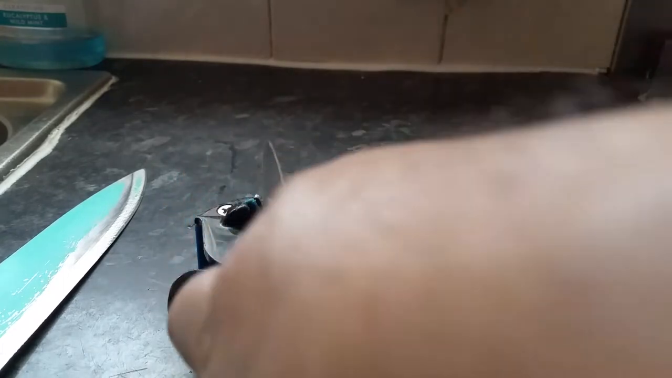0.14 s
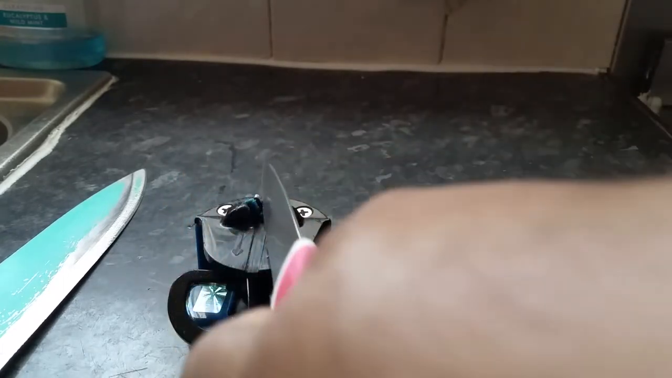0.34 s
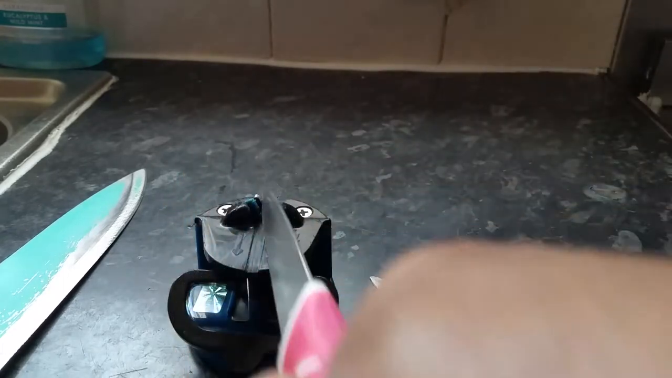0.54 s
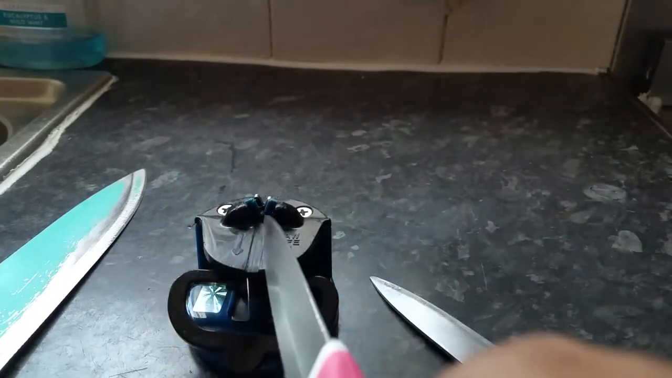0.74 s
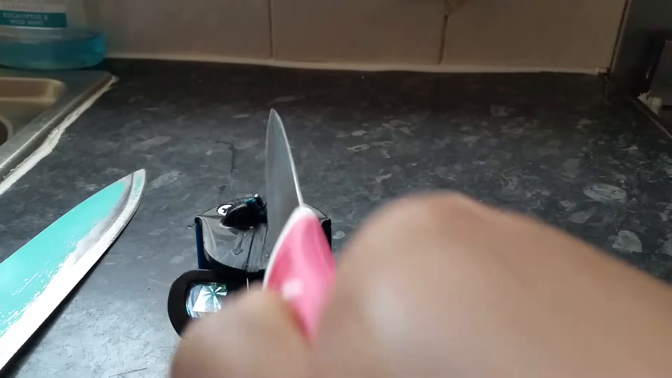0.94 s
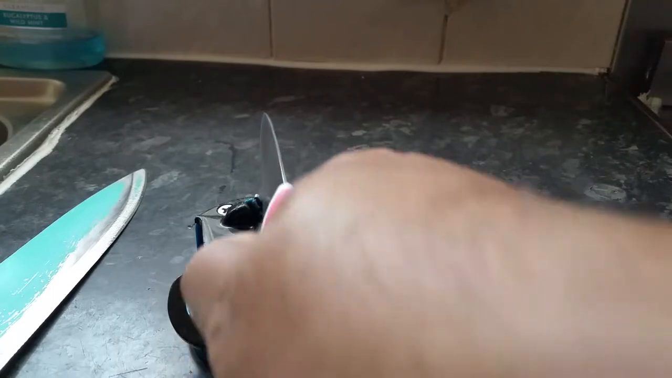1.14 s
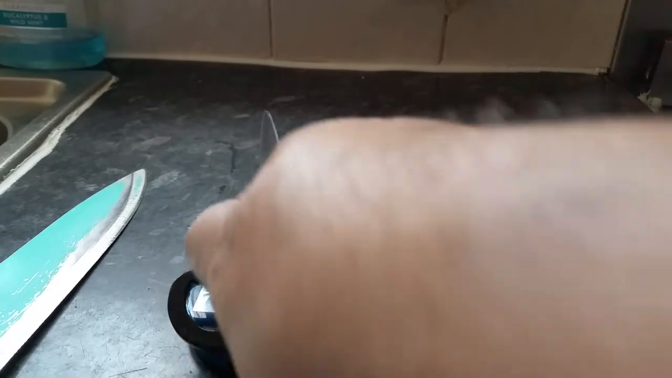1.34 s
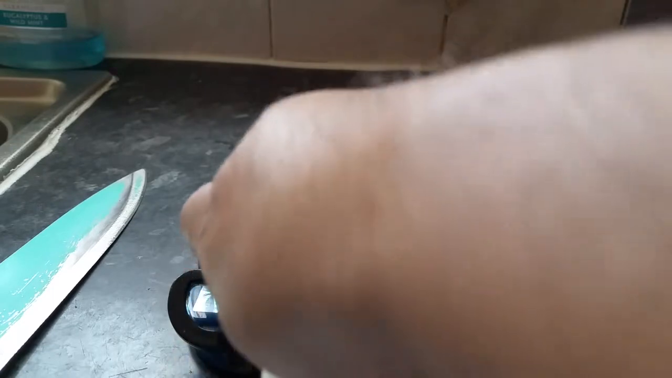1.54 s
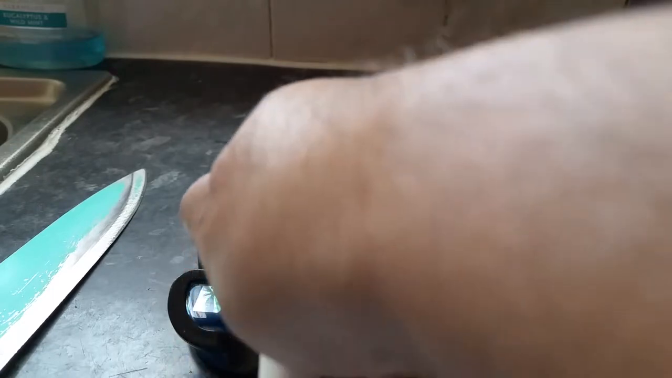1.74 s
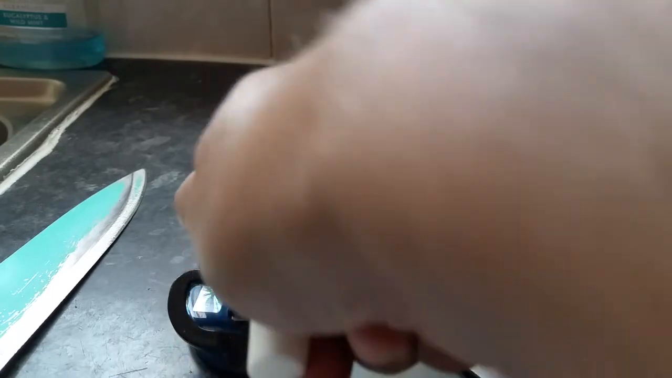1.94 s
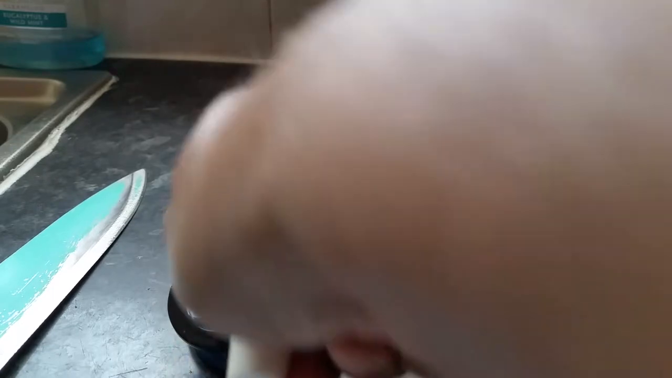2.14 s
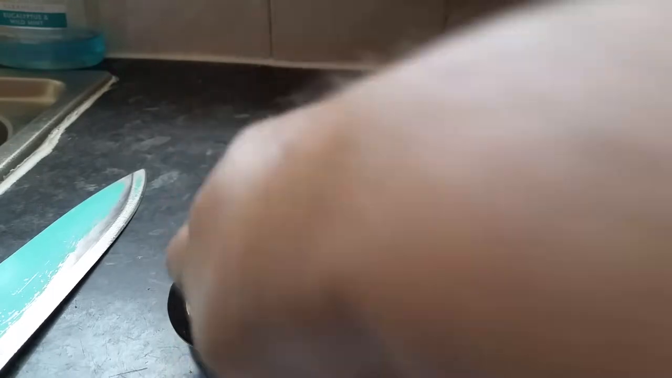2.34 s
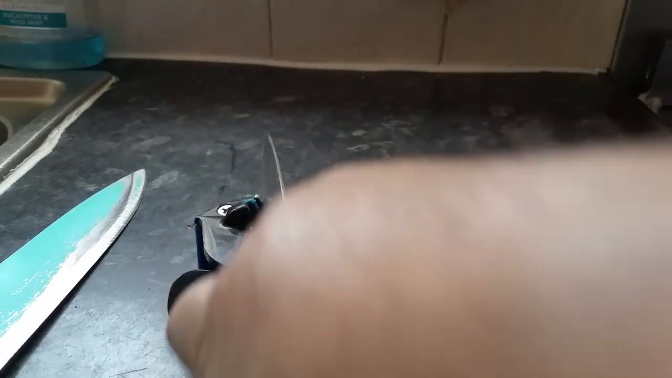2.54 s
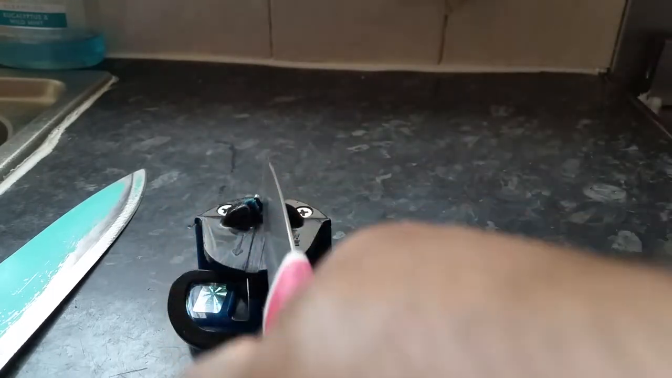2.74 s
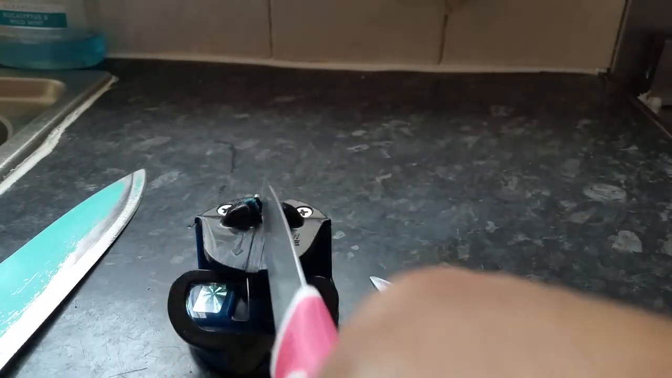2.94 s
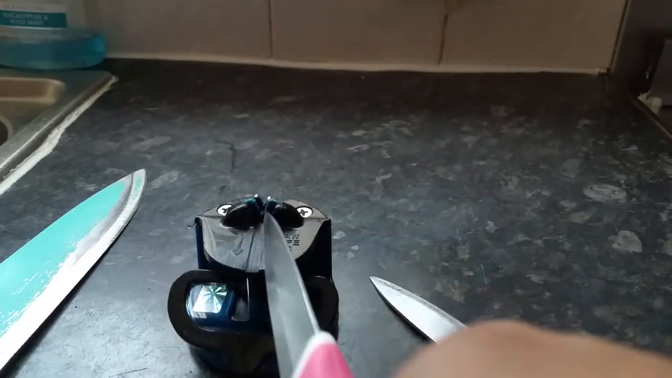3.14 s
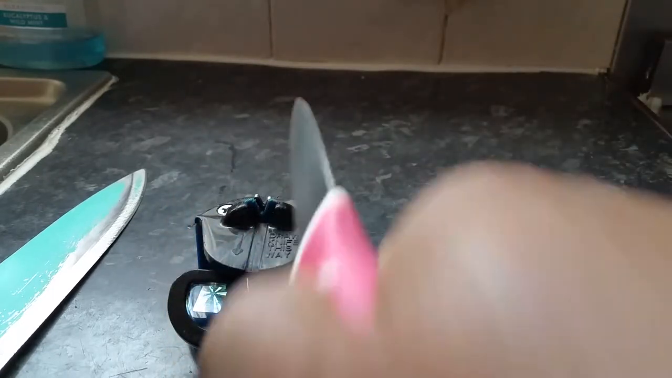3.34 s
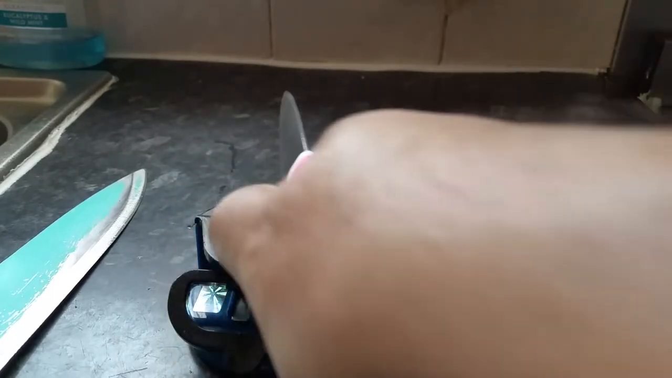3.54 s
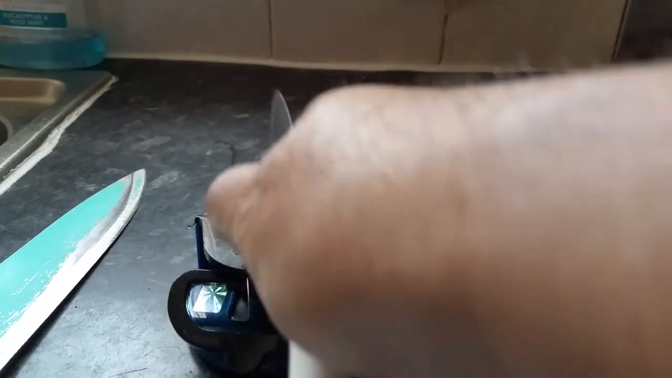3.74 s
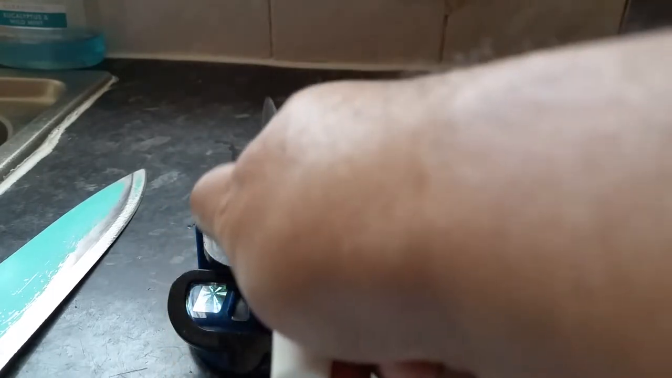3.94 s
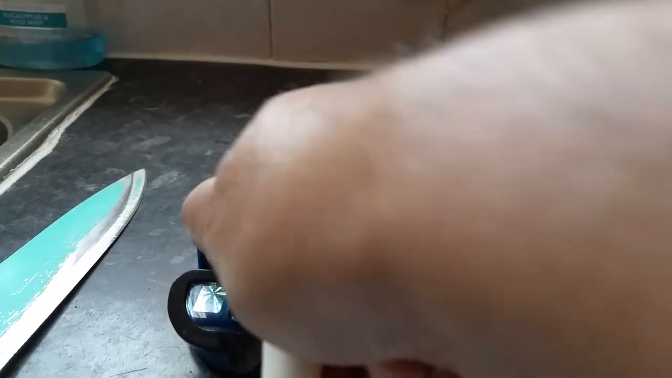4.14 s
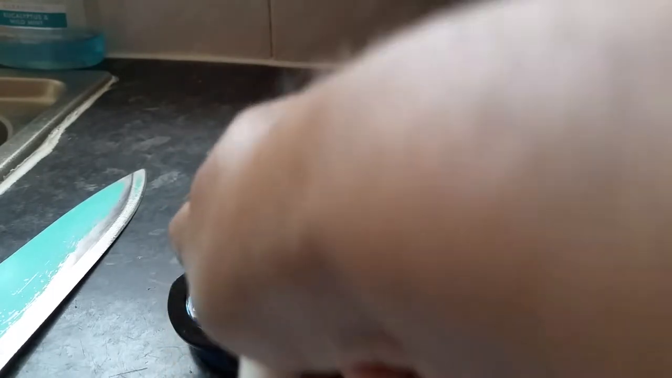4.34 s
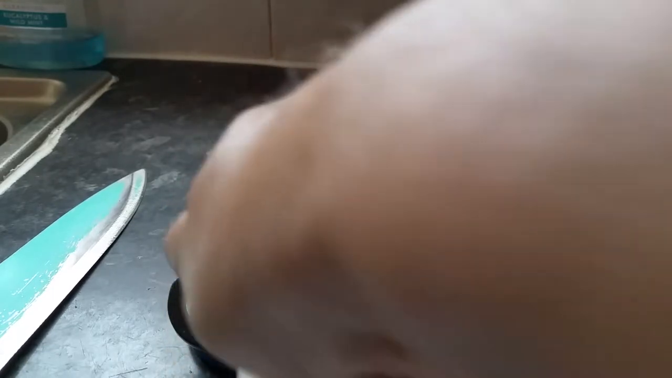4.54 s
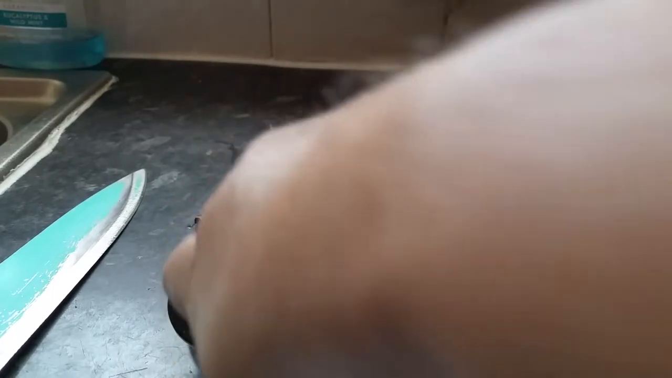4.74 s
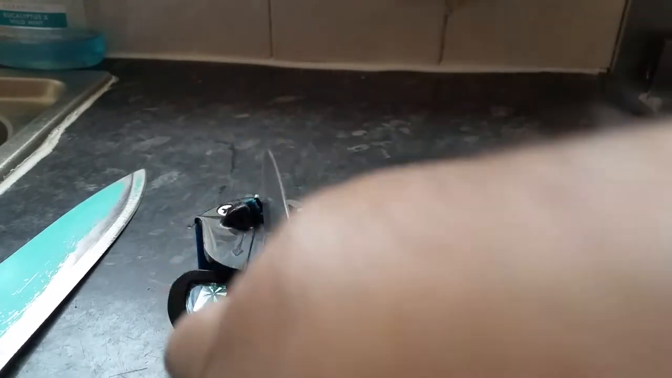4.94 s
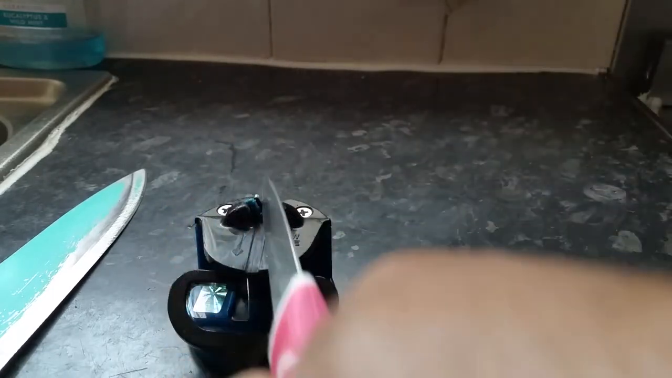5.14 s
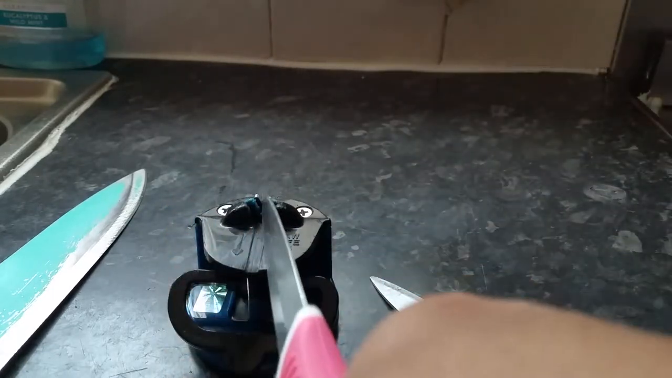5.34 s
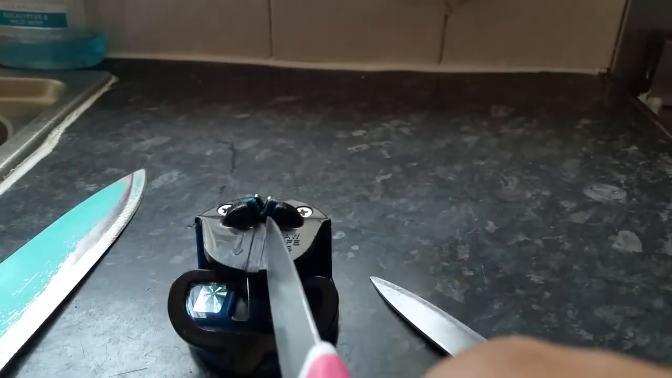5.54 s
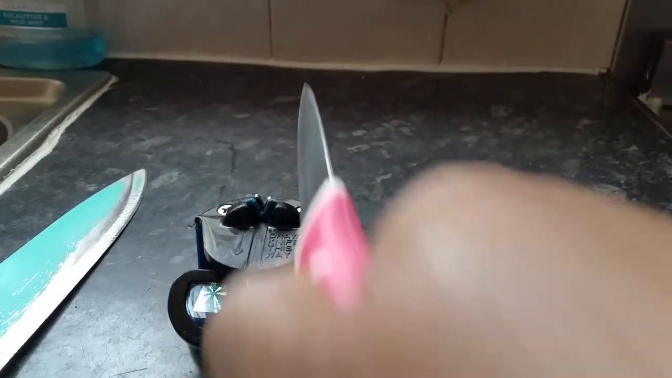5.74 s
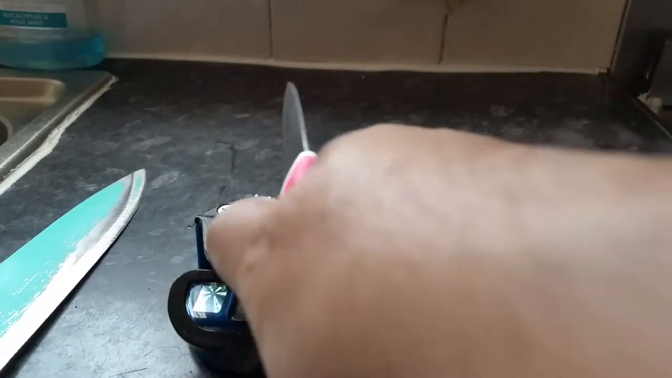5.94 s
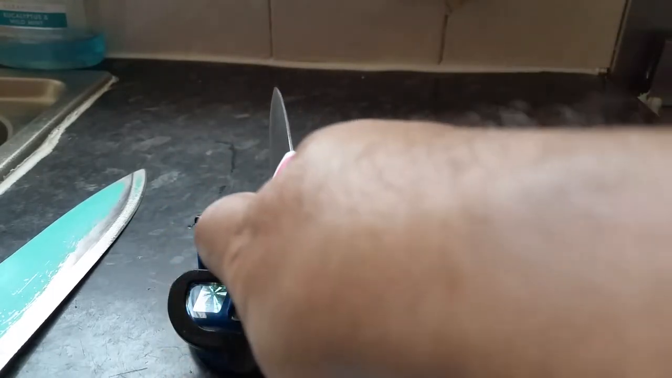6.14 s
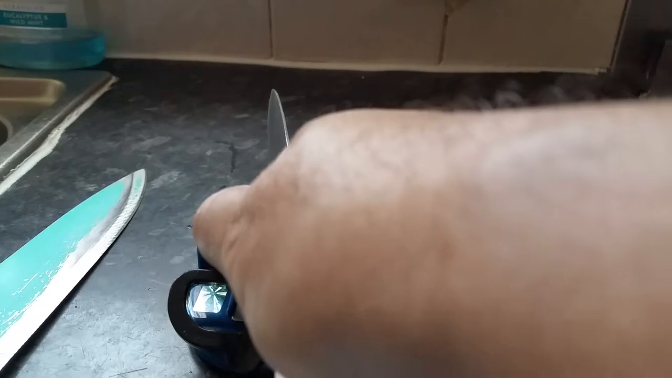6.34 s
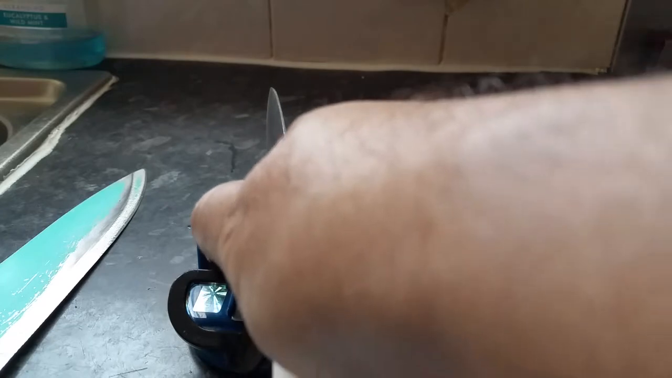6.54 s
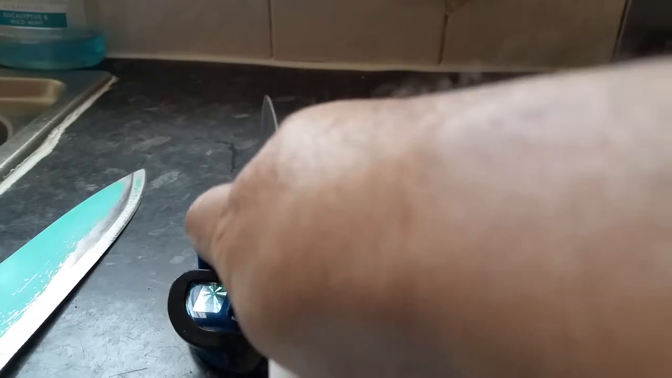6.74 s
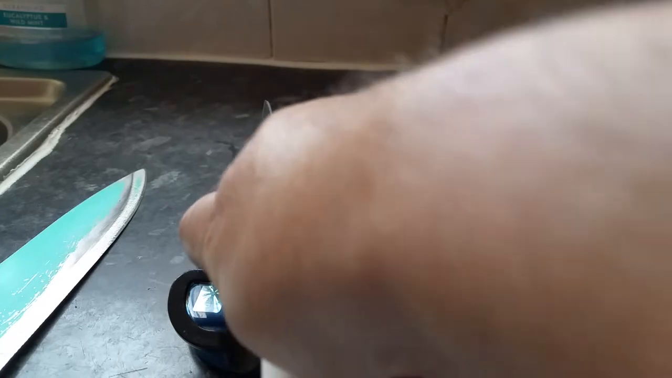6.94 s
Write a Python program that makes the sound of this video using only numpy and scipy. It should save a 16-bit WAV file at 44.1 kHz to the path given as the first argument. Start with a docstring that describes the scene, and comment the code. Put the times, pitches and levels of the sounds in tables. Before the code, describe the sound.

Three gritty, metallic scrapes of a blade drawn through a sharpener on a worktop, separated by plastic knocks and scuffs.

```python
"""Sharpening a kitchen knife

A knife is drawn three times through a pull-through sharpener standing on a worktop. Rough grit rasps
the steel edge and shakes the plastic housing and the worktop; the tip clicks as it leaves the slot.
Between pulls the blade scuffs and knocks its way back in. A small tiled kitchen echoes and hums."""
import sys
import numpy as np
from scipy import signal
from scipy.fft import rfft, irfft, next_fast_len
from scipy.io import wavfile
from scipy.ndimage import map_coordinates

SR = 44100
rng = np.random.default_rng(int(sys.argv[2]) if len(sys.argv) > 2 else 0)


def materialize(psi):
    """Save the field psi as 16-bit PCM at rate SR to the path in sys.argv[1].

    A 1-D psi becomes a single channel; in a 2-D psi each row is a channel.
    """
    bounded = np.clip(np.atleast_2d(psi).T, -1, 1)
    quanta = np.round(bounded * 32767).astype(np.int16)
    wavfile.write(sys.argv[1], SR, quanta)


N = 308611


def amp(db):
    """Turn decibels into a number to multiply by."""
    return 10 ** (np.asarray(db) / 20)


def unit(x):
    """Scale a signal to an average (rms) size of 1."""
    return x / np.sqrt(np.mean(x ** 2) + 1e-20)


def along(points, hz):
    """Read between (frequency, value) points on a logarithmic frequency scale."""
    f, values = np.transpose(points)
    return np.interp(np.log(hz + 1), np.log(f + 1), values)


def colour(spectrum):
    """Make a tone curve from (f/Hz, level/dB) points."""
    return lambda hz: amp(along(spectrum, hz))


def resonances(modes, hz):
    """A tone curve with a peak for each (f/Hz, width/Hz, level/dB) row."""
    return np.sqrt(sum((amp(db) * hz * width) ** 2 / ((hz * width) ** 2 + (hz ** 2 - f ** 2) ** 2)
                       for f, width, db in modes))


def filtered(x, response):
    """Scale and shift each frequency of x as response says."""
    n = x.shape[-1]
    size = next_fast_len(n + 8192)
    return irfft(rfft(x, size) * response(np.fft.rfftfreq(size, 1 / SR)), size)[..., :n]


def body(x, gain, size=4096):
    """Let x ring through an object whose tone curve is gain."""
    cepstrum = irfft(np.log(np.maximum(gain(np.fft.rfftfreq(size, 1 / SR)), 1e-6)))
    # fold it so that the ringing comes after each push, never before
    cepstrum[1:size // 2] *= 2
    cepstrum[size // 2 + 1:] = 0
    return signal.fftconvolve(x, irfft(np.exp(rfft(cepstrum))))[:len(x)]


def spread(pair):
    """Mix two unrelated signals into left and right, alike in the bass."""
    # how alike the two sides are: f/Hz, likeness (1 = the same, 0 = unrelated)
    alike = [(100, 0.84), (330, 1), (700, -0.053), (1200, 0.16), (3000, -0.27), (6500, -0.059),
             (14000, -0.47)]
    turn = lambda hz: np.arccos(np.clip(along(alike, hz), -1, 1)) / 2
    mid, side = filtered(pair, lambda hz: np.array([np.cos(turn(hz)), np.sin(turn(hz))]))
    return np.array([mid + side, mid - side])


def wobble(rate):
    """A smooth curve through rate random values a second."""
    return map_coordinates(rng.standard_normal(int(N * rate / SR) + 4), [np.arange(N) * rate / SR])


def add(track, s, sound):
    """Lay a sound into a track at s seconds."""
    start = max(round(s * SR), 0)
    track[start:start + len(sound)] += sound[:N - start]


def contact(start, end, attack_s, release_s):
    """1 during a touch, rising just before start and dying away after end."""
    t = np.arange(N) / SR
    fade = np.maximum(start - t, 0) / attack_s + np.maximum(t - end, 0) / release_s
    return np.exp(-np.minimum(fade, 30))


def progress(start, end):
    """0 before start, rising evenly to 1 at end."""
    return np.clip((np.arange(N) / SR - start) / (end - start), 0, 1)


def pulls(attack_s=0.0077, release_s=0.0075, settle_s=0.0084, bite_s=0.0023,
          growl_db=2.5, boom_db=-0.5):
    """Each pull gives four curves: blade rasp, housing growl, worktop boom and travel along the edge."""
    # how hard the edge presses, one list per pull from heel (handle end) to tip: t/s, level/dB
    pressures = [
        [(0.0, -33.5), (0.19, -36.5), (0.202, -39), (0.388, -33), (0.484, -38.5), (0.544, -34.5), (0.6, -38),
         (0.662, -38.5), (0.672, -38.5)],
        [(2.35, -47.5), (2.398, -30), (2.45, -37), (2.622, -32.5), (2.772, -35.5), (2.796, -34), (2.984, -46),
         (3.108, -38.5), (3.115, -54)],
        [(4.6, -41), (4.702, -43), (4.712, -37.5), (4.752, -46.5), (4.792, -35), (4.966, -32), (5.004, -35.5),
         (5.282, -36.5), (5.315, -52)],
    ]
    # how much each pull shakes what lies below: t/s, housing level/dB, worktop level/dB
    shakes = [
        [(0.0, -30, -27), (0.018, -34, -30), (0.146, -33.5, -31.5), (0.258, -37, -37), (0.282, -33.5, -38),
         (0.484, -36.5, -39), (0.524, -32.5, -45.5), (0.664, -38.5, -42), (0.67, -34, -39.5)],
        [(2.36, -33.5, -32), (2.508, -35, -33.5), (2.534, -35.5, -41.5), (2.608, -29, -30.5),
         (2.636, -33.5, -35.5), (2.814, -35, -38), (2.844, -38, -37), (3.002, -45, -54), (3.11, -38.5, -37.5)],
        [(4.62, -35.5, -31), (4.646, -40, -34.5), (4.768, -39.5, -41.5), (4.844, -34.5, -32),
         (4.932, -37, -37.5), (5.026, -33, -32), (5.074, -38, -33), (5.26, -35.5, -46.5), (5.31, -40.5, -44.5)],
    ]
    # the edge bites on coarse spots: t/s, change in pressure/dB
    bites = [(0.064, 5.5), (0.149, 4.5), (0.178, 9), (0.305, 8.5), (0.393, 3), (0.431, 2), (2.384, 5.5),
             (2.4, 1.5), (2.564, -6), (2.614, 7), (2.856, 7), (4.605, 1), (4.771, 2.5), (4.787, 4),
             (4.88, 6.5), (4.945, -1), (5.079, 2.5)]
    out, t = np.zeros((4, N)), np.arange(N) / SR
    bite = amp(sum(db / (1 + ((t - s) / bite_s) ** 2) ** 2 for s, db in bites))
    for pressure, shake in zip(pressures, shakes):
        times, db = np.transpose(pressure)
        start, end = times[0], times[-1]
        rasp = amp(np.interp(t, times, db)) * contact(start, end, attack_s, release_s) * bite
        when, housing_db, board_db = np.transpose(shake)
        shaking = contact(start, end, attack_s, settle_s)  # outlasts the blade's rasp a little
        growl = shaking * amp(growl_db + np.interp(t, when, housing_db))
        boom = shaking * amp(boom_db + np.interp(t, when, board_db))
        out += [rasp, growl, boom, shaking * progress(start, end)]
    return out


def grit(rate, scatter_db):
    """Grains catch the edge at random, about rate times a second, each with its own force."""
    catches = (rng.random(N) < rate / SR) * amp(scatter_db * np.clip(rng.standard_normal(N), -2, 2))
    return catches * rng.standard_normal(N)


def steel(hz, travel, hiss_db=-8):
    """The blade's tone curve: it rings over the hiss of the grit, singing higher near the tip."""
    # where the clamped blade rings: f/Hz, width/Hz, level/dB
    modes = [(2270, 110, -3), (2760, 250, -2.5), (3480, 100, 0), (4090, 150, -3), (4800, 110, -1.5),
             (5165, 135, 3.2), (5970, 170, -11), (6930, 56, -13), (8200, 320, -13.5), (8590, 140, -5.5),
             (10100, 101.7, -23.5), (11300, 180, -22)]
    # the hiss of the grit: f/Hz, level/dB
    hiss = [(1120, -40), (1900, -2), (2300, 0.5), (2470, -11.5), (3210, -0.5), (3480, -17.5), (4450, -11.5),
            (5180, -5), (5620, -5), (6380, 3.5), (7580, -9), (8680, -15), (10700, -23.5), (15600, -36.5),
            (16500, -61.5)]
    peaks = resonances(modes, hz) * np.minimum(hz / 2000, 1)
    bump = lambda centre_hz, width_hz, db: db / (1 + ((hz - centre_hz) / width_hz) ** 2)
    tip = bump(centre_hz=6350, width_hz=330, db=12)
    heel = bump(centre_hz=5200, width_hz=170, db=4)
    return amp((travel - .5) * (tip - heel)) * np.hypot(peaks, amp(hiss_db + along(hiss, hz)))


def plastic(hz, low_hz=230, top_hz=2200):
    """The housing's tone curve: narrow peaks in the middle range only."""
    # where the plastic rings: f/Hz, width/Hz, level/dB
    modes = [(311, 10, 2), (394, 120, -0.5), (475.3, 11, 4), (534.4, 36, -4), (584, 24.2, -4),
             (650, 20, -5.5), (708, 33, -5.5), (813, 48, -0.5), (964, 63, 2), (1077, 10, 0),
             (1214, 46, -4.5), (1477, 69, -9.5), (1605, 60, -6.5), (1734, 120, -7)]
    return resonances(modes, hz) * hz ** 2 / (hz ** 2 + low_hz ** 2) / (1 + (hz / top_hz) ** 6)


def grinding(rasp, growl, travel, rasp_db=-0.5, growl_db=-3.5, fizz_db=-31, fizz_growth=0.76,
             snag_db=6, slip_hz=36, slip_db=1.4, rock_hz=14, rock_share=0.2):
    """The edge drags unevenly over the grit, shaking blade and housing together."""
    drag = amp(slip_db * wobble(slip_hz))  # the edge sticks and slips
    place = np.clip(travel + rock_share * wobble(rock_hz), 0, 1)  # the hand rocks the touching point
    fine = drag * grit(rate=7000, scatter_db=2.0)
    snags = amp(snag_db) * grit(rate=71, scatter_db=4.5)
    heel = body(fine + snags, lambda hz: steel(hz, travel=0))
    tip = body(fine + snags, lambda hz: steel(hz, travel=0.96))
    blade = unit((1 - place) * heel + place * tip)
    fizz_tone = colour([(4000, -50.5), (8500, 16.5), (12500, 16.5), (16000, -5)])
    fizz = unit(body(drag * grit(rate=2300, scatter_db=2.5), fizz_tone))
    housing = unit(body(drag * grit(rate=2300, scatter_db=-0.5), plastic))
    return (amp(rasp_db) * rasp * blade
            + amp(fizz_db) * rasp ** fizz_growth * fizz  # even a light touch fizzes
            + amp(growl_db) * growl * housing)


def worktop(boom, low_hz=55, top_hz=400):
    """The sharpener's feet shake the worktop, which booms at its own low pitches."""
    # where the board rings: f/Hz, width/Hz, level/dB
    modes = [(72, 12, -8), (112, 20, 1.5), (137, 27, -3), (174, 22, 0), (205, 24, -4.5), (318, 83, -12)]
    # rumble from the hand steadying the sharpener: t/s, level/dB
    hold = [(0, -80), (1.1, -62), (2.1, -61), (3.301, -57.5), (3.8, -56.5), (4.301, -65.5), (5.8, -64),
            (6.35, -57), (6.701, -63), (7, -59.5)]
    band = lambda hz: hz ** 2 / (hz ** 2 + low_hz ** 2) / (1 + (hz / top_hz) ** 4)
    board = lambda hz: resonances(modes, hz) * band(hz)
    hand = amp(np.interp(np.arange(N) / SR, *np.transpose(hold)))
    return np.hypot(boom, hand) * unit(body(grit(rate=1500, scatter_db=0), board, size=16384))


def kitchen(x, early_db=5, early_fade_s=0.013):
    """Nearby tiles echo first, then the whole room dies away."""
    # how long the echo takes to fall by 60 dB: f/Hz, fade time/s
    fades = [(100, 0.8), (500, 0.59), (2000, 0.42), (5000, 0.3265), (14000, 0.38)]
    hz, t, noise = signal.stft(spread(rng.standard_normal((2, SR // 2))), SR, nperseg=256)
    decay = amp(-60 * t / along(fades, hz)[:, None]) + amp(early_db - 60 * t / early_fade_s)
    echo = signal.istft(noise * decay, SR, nperseg=256)[1]
    echo = np.pad(echo / np.linalg.norm(echo[0]), ((0, 0), (SR // 300, 0)))  # arrives about 3 ms late
    return signal.fftconvolve(x[None], echo, axes=1)[:, :N]


def background(air_db=-61, hum_db=-1, hiss_db=-78):
    """Still room air, the wavering hum of an appliance and a faint, even hiss."""
    # the tone of the quiet room: f/Hz, level/dB
    air_tone = [(15, -59.5), (25, -38.5), (65, -11.5), (87, -24), (226, -4), (252, -21.5), (296, 2),
                (321, -11.5), (496, -11), (669, -20.5), (952, -18), (1550, -25), (5420, -30.5),
                (14400, -40), (16500, -43.5)]
    # the appliance's notes: f/Hz, level/dB
    notes = [(64.6, -66.5), (113.0, -70.5), (296.1, -68)]
    t = np.arange(N) / SR
    hum = sum(amp(db) * np.sin(2 * np.pi * hz * t + 2.3 * wobble(rate=25)) for hz, db in notes)
    air = unit(filtered(spread(rng.standard_normal((2, N))), colour(air_tone)))
    return amp(air_db) * air + amp(hum_db) * hum + amp(hiss_db) * rng.standard_normal((2, N))


def judders(hz=71, width_hz=20, attack_s=0.0077, release_s=0.012):
    """Dragged too hard, the sharpener judders on its feet with a deep, unsteady note."""
    # bursts of juddering: t/s, length/s, level/dB
    bursts = [(0.06, 0.045, -45.5), (0.267, 0.031, -48.5), (2.205, 0.023, -39), (2.335, 0.032, -54),
              (2.485, 0.072, -42), (2.631, 0.07, -50), (4.399, 0.022, -45.5), (4.623, 0.05, -44.5),
              (4.74, 0.081, -45), (5.06, 0.025, -50.5), (5.411, 0.021, -52)]
    level = sum(amp(db) * contact(s, s + length, attack_s, release_s) for s, length, db in bursts)
    feet = lambda f: resonances([(hz, width_hz, 0)], f) ** 3
    return level * unit(filtered(rng.standard_normal(N), feet))


def flicks(flick_db=-22, fade_s=0.016):
    """The tip snaps free of the grit and buzzes for a moment around one strong pitch."""
    # each snap: t/s, level/dB, ring f/Hz, ring width/Hz, ring level/dB, buzz level/dB
    snaps = [(0.683, -11, 3436, 544, 9.5, -14), (0.815, -40.5, 2840, 489, -2.5, -14),
             (2.722, -27, 4220, 400, 7, -21), (3.269, -27.5, 2560, 601, 0.5, -21),
             (5.406, -28.5, 3050, 592, -12, -15.5), (5.631, -43, 2580, 700, 13, -12.5)]
    # the tone of the tip's click: f/Hz, level/dB
    tip_tone = [(150, -5), (500, 3.5), (1000, -2.5), (1600, -9), (2500, 3), (4700, -14.5), (6200, -4.5),
                (7300, -10), (8100, -6.5), (9000, -15.5), (10000, -12), (16000, -22)]
    out, t = np.zeros(N), np.arange(SR // 6) / SR
    for s, db, ring_hz, width_hz, ring_db, buzz_db in snaps:
        snap = rng.standard_normal(len(t)) * amp(buzz_db - 60 * t / fade_s)
        snap[0] = 1  # the release itself
        peak = lambda hz: amp(ring_db) / (1 + ((hz - ring_hz) / width_hz) ** 2) ** 2
        ping = body(snap, lambda hz: amp(along(tip_tone, hz)) + peak(hz))
        add(out, s, amp(db + flick_db) * unit(ping))
    return out


def ring(t, blow, scatter_db=2.0, detune=0.013, attack_s=0.00083):
    """A blow sets the housing ringing; the grip shifts its notes a little each time."""
    # notes of the sharpener on the worktop and the blade in it: f/Hz, level/dB, time to fall 60 dB/s
    modes = [(117, -6, 0.12), (184, 1.5, 0.054), (296, 0.5, 0.05), (459, 2.5, 0.039), (545, -3.5, 0.03),
             (596, 1.5, 0.053), (663, 4.5, 0.03), (794, 9, 0.018), (985, 3, 0.021), (1180, 9.5, 0.012),
             (1450, 5, 0.016), (1750, -1, 0.016), (2150, -1, 0.011), (2360, -11, 0.0048),
             (3570, -10.5, 0.0053)]
    out = 0
    for hz, db, fade_s in modes:
        strength, shift, phase = rng.standard_normal(3)
        level_db = db + along(blow, hz) + scatter_db * strength
        note = np.cos(2 * np.pi * hz * (1 + detune * shift) * t + .5 * phase)
        out = out + amp(level_db - 60 * t / fade_s) * note
    return out * (1 - np.exp(-t / attack_s))


def crack(t, fade_s=0.016):
    """The brief bright burst of steel meeting something hard."""
    # the tone of the burst: f/Hz, level/dB
    tone = [(500, 2), (2000, 0.5), (4000, -3), (5200, -7), (7000, -11.5), (11000, -18.5), (16000, -22.5)]
    return unit(body(rng.standard_normal(len(t)), colour(tone))) * amp(-60 * t / fade_s)


def knocks(jolt_db=5, contact_s=0.00058, crack_db=10, rattle_fade_s=0.037, low_hz=55):
    """The blade bumps the sharpener: steel cracks, the housing knocks and rattles, the worktop thuds."""
    # knocks, taps and small bounces of blade and sharpener, each with its own mix of four sounds:
    # t/s, level/dB, then on top of that level: thud/dB, hollow ring/dB, clack/dB, crack/dB
    hits = [(0.704, -48.5, 17, 13, -11, -18.5), (1.185, -39, 2.5, 3, -4, 1), (1.268, -43.5, 6, 4.5, -8, -5),
            (1.59, -36, 4.5, -6, 6, -5.5), (1.867, -36, 7, -7, -20, 1.5),
            (2.216, -36.5, 3.5, 15.5, -1.5, -10), (2.219, -27, 7, -10.5, 10.5, -6),
            (2.238, -45.5, 22, 4, -11, -4), (2.25, -33.5, 1, 2.5, -24, -3.5),
            (2.329, -16.5, -23, 1, -5, -8), (3.128, -53, 14, 7, -9, -15), (3.269, -39, -7.5, -6, -5, -5.5),
            (3.682, -43, 10, 1.5, -1, -15), (3.754, -53, 16, 4, -8, -14), (4.045, -61.5, 7.5, 9, -3.5, -14),
            (4.073, -40.5, 7.5, 1.5, -7, -5.5), (4.355, -42.5, 3, -1, -8.5, -13.5),
            (4.378, -23, -7, 10.5, 3, -3), (4.394, -38, 1, 12, 0, -10), (4.411, -44, 6, 14, -4, -14),
            (4.577, -11.5, -24, -1.5, -4.5, -13.5), (4.592, -36, -3.5, 1.5, -4, -13),
            (4.609, -37.5, 8, -3, 2, -9), (4.649, -44, 16.5, -12, -3, 5.5), (5.392, -48, -16, 2, 4, 4.5),
            (6.2, -57, 20, 2, -16, -14.5), (6.803, -54.5, -5, -7, 22, 9.5),
            (6.86, -29.5, -6.5, -1, 8, -12.5)]
    out, t = np.zeros(N), np.arange(SR // 6) / SR
    swing = t / contact_s - 2
    jolt = -2 * swing * np.exp(-swing ** 2)  # the housing moves out and back once
    for s, db, thud, hollow, clack, bright in hits:
        blow = [(260, thud), (580, hollow), (670, hollow),
                (900, 0.0054), (2100, clack), (3500, clack / 2)]  # f/Hz, level/dB
        muffled = lambda hz: amp(along(blow, hz)) / (1 + (hz / 1200) ** 2)
        rattle = amp(-60 * t / rattle_fade_s) * body(rng.standard_normal(len(t)), muffled)
        knock = ring(t, blow) + amp(jolt_db + hollow) * jolt
        add(out, s, amp(db) * (knock + rattle + amp(bright + crack_db) * crack(t)))
    # the knocks carry little deep bass
    return body(out, lambda hz: 0.0079 + hz ** 2 / (hz ** 2 + low_hz ** 2))


def scuffs(travel=0.36, attack_s=0.004, release_s=0.0099, boom_db=-12.5, dull_boom=0.64):
    """Bright brushes touch the grit, dull ones the plastic; gives the same four curves as pulls()."""
    # light touches on the way out and back in: t/s, length/s, level/dB, brightness/dB, swell/dB
    brushes = [(1.189, 0.07, -37, -6.5, -1.5), (1.284, .125, -44.5, -8.5, -1), (1.452, 0.12, -47, -9.5, -4),
               (1.611, 0.062, -56.5, -16, -25.5), (1.773, 0.086, -56, -2, -14.5),
               (1.861, 0.065, -48.5, -14.5, -0.5), (2.171, 0.018, -42, -9.5, 6.5),
               (2.217, 0.034, -35, -9.5, -8.5), (2.307, 0.019, -34, -11, 11),
               (3.127, 0.06, -51.5, -7, -4.5), (3.687, 0.037, -53, -11, -7.5),
               (3.748, 0.1, -58, -21.5, -5.5), (4.046, 0.019, -65, -20.5, -4.5),
               (4.085, 0.062, -60.5, -26.5, -1.5), (4.355, 0.025, -41.5, -6, 4),
               (4.399, 0.029, -39, -19, -8.5), (4.484, 0.059, -42.5, -11, -14.5),
               (4.573, 0.053, -36, -15, -9.5), (5.393, 0.0087, -36.5, -12, -1),
               (5.416, 0.031, -67, -44, 11.5), (5.45, 0.013, -53, 5.5, -5), (6.216, 0.22, -73.5, -34, -2.5),
               (6.806, 0.05, -54, -2, -7)]
    out = np.zeros((4, N))
    for s, length, db, bright, swell in brushes:
        touch = contact(s, s + length, attack_s, release_s)
        force = touch * amp(db + swell * (progress(s, s + length) - .5))
        boom = force * amp(boom_db - dull_boom * bright)  # duller brushes shake the worktop more
        out += [force * amp(bright), force, boom, travel * touch]
    return out


def scene(rub_room_db=-6.5, knock_room_db=-5, flick_room_db=-4, blade_width_db=-8.5, board_width_db=-12):
    """The sharpener stands close by and a little to the left, so the two sides hear it out of step."""
    # how far the left side's wave runs ahead: f/Hz, lead/radians
    lead = [(0, -0.5), (860, 0.44), (1120, 0.77), (3010, 0.52), (4310, -2), (4740, 1), (6030, -0.15),
            (6630, 1), (7920, 1), (8180, 0.7), (8530, 1), (12500, -2.5), (14600, -1), (16300, 10.5)]
    # how much louder the left side is than the right: f/Hz, level/dB
    balance = [(40, 3.5), (90, 2.5), (300, 2.5), (1200, -0.5), (3000, 3), (6400, 4), (9500, 7.5),
               (15000, 0.5)]
    rasp, growl, boom, travel = pulls() + scuffs()
    travel = np.minimum(travel, 1)
    rub = grinding(rasp, growl, travel) + worktop(boom) + judders()
    knock, flick = knocks(), flicks()
    out_of_step = lambda hz: np.exp(1j * np.outer([.5, -.5], np.clip(along(lead, hz), -1.9, 1.9)))
    direct = filtered(rub + knock + flick, out_of_step)
    # blade and worktop are wide and close, so part of their sound differs between the sides
    side = amp(blade_width_db) * grinding(rasp, growl, travel) + amp(board_width_db) * worktop(boom)
    room = amp(rub_room_db) * kitchen(rub)
    room += kitchen(amp(knock_room_db) * knock + amp(flick_room_db) * flick)
    lean_left = lambda hz: amp(np.outer([.5, -.5], along(balance, hz)))
    return filtered(direct + np.outer([1, -1], side) + room, lean_left) + background()


def record(dry, top_hz=16550):
    """Cut off the very highest treble."""
    return filtered(dry, lambda hz: hz < top_hz)


dry = scene()
out = record(dry)
materialize(out)
```